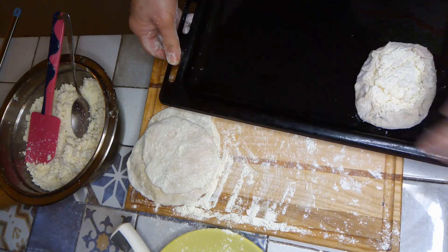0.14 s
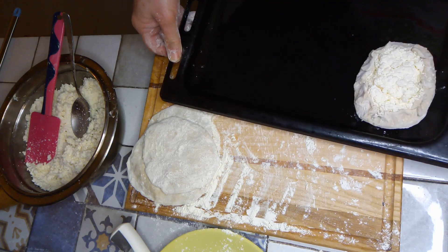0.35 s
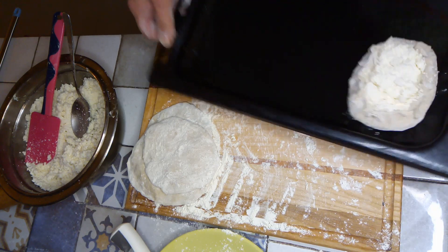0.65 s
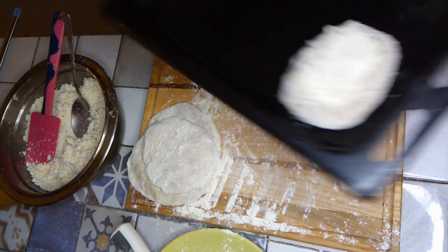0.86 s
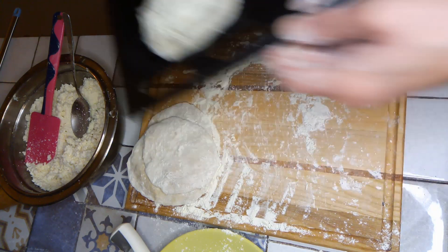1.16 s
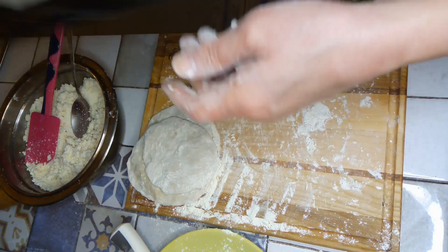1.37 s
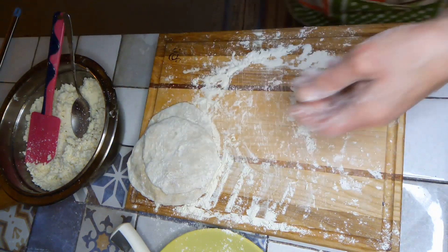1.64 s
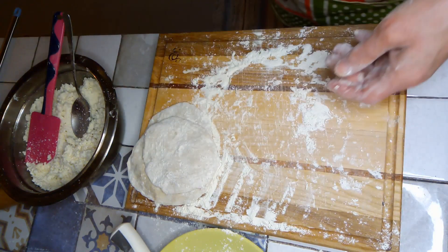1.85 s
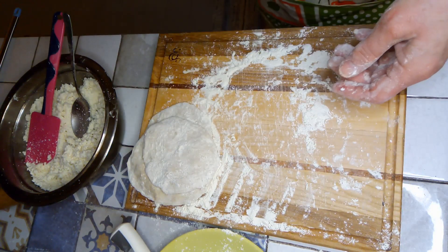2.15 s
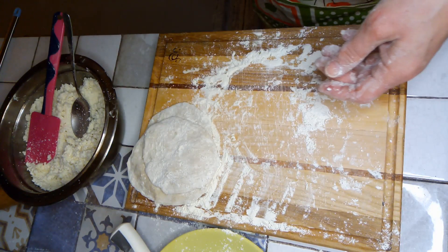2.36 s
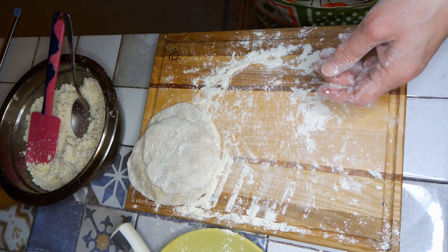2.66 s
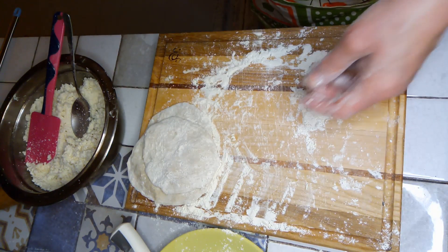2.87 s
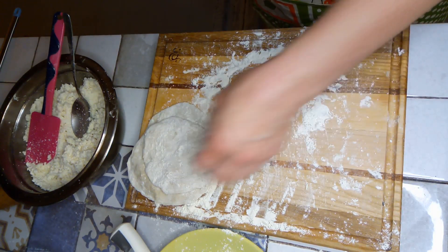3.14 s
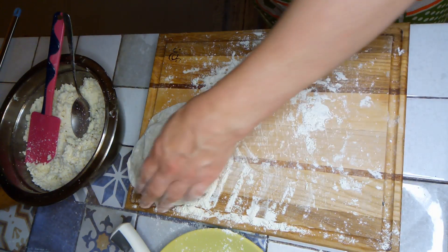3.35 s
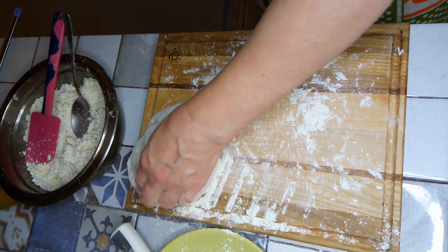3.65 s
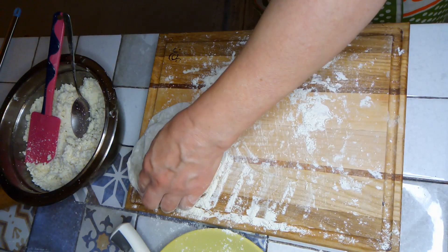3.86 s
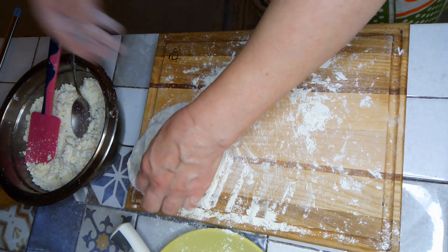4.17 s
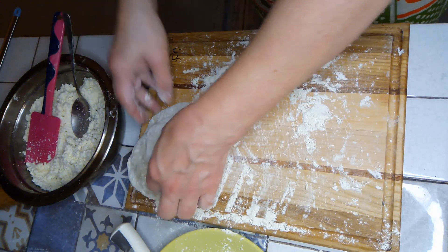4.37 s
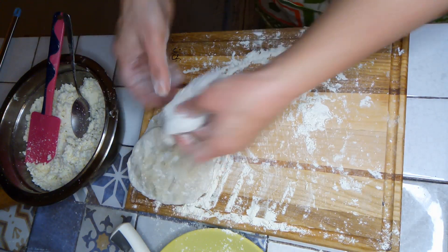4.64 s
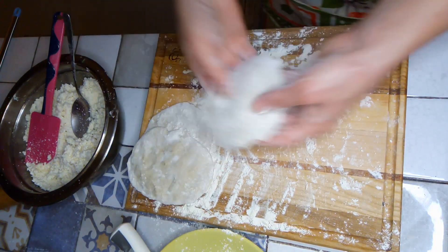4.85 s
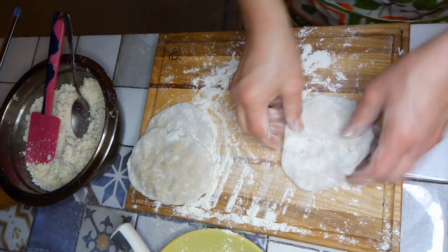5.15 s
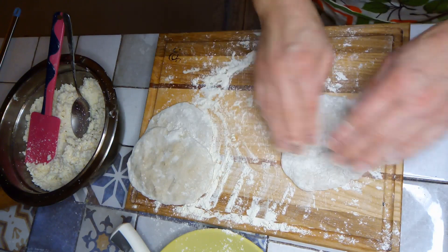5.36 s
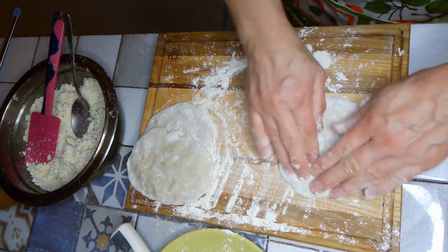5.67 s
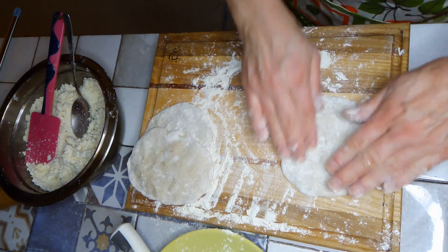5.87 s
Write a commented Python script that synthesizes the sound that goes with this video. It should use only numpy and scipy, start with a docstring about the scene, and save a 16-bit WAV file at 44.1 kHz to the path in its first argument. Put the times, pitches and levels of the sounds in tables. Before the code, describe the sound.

Short gritty steel scrapes, a hard clattering knock and woody bumps, then quiet dough handling over faint room hum.

```python
"""A baking tray is slid off a floured wooden board in short pulls and put down to one side with a knock.
The slide is grainy friction noise ringing sheet-steel modes; the knock is struck modes plus dense clatter.
The wooden furniture under the tray bumps, shudders and knocks. Hands press, flip and pat dough: soft hisses
of flour, dull pats, ticking crumbs. A thin metal object, likely a steel bowl, sings faintly when grazed.
A small kitchen answers with decaying noise; behind it all lie room air, a wavering hum and faint hiss."""
import sys
import numpy as np
from scipy import signal
from scipy.fft import rfft, irfft, next_fast_len
from scipy.io import wavfile
from scipy.ndimage import uniform_filter1d, map_coordinates

SR = 44100
rng = np.random.default_rng(int(sys.argv[2]) if len(sys.argv) > 2 else 0)


def log_audio(samples):
    """Write samples as a 16-bit WAV file to the path given in sys.argv[1]."""
    # one column per channel
    frames = np.atleast_2d(samples).T
    # limit to full scale, then quantise
    limited = np.clip(frames, -1, 1)
    pcm = np.round(limited * 32767).astype(np.int16)
    wavfile.write(sys.argv[1], SR, pcm)


N = 265041


def amp(db):
    """Decibels to gain."""
    return 10 ** (np.asarray(db) / 20)


def unit(x):
    """Scale to rms 1."""
    return x / np.sqrt(np.mean(x ** 2) + 1e-20)


def clock():
    """The time of every sample, in seconds."""
    return np.arange(N) / SR


def along(points, hz):
    """(Hz, value) points read on a log frequency axis."""
    point_hz, values = np.transpose(points)
    return np.interp(np.log(hz + 1), np.log(point_hz + 1), values)


def swell(centre_s, sigma_s):
    """A Gaussian bell of gain around centre_s."""
    return np.exp(-.5 * ((clock() - centre_s) / sigma_s) ** 2)


def stroke(start_s, length_s, rise_db_per_s, fall_db_per_s):
    """Gain of one sliding movement: it takes hold, lasts and dies away."""
    t = clock() - start_s
    before_s = np.maximum(-t, 0)
    after_s = np.maximum(t - length_s, 0)
    return amp(-rise_db_per_s * before_s - fall_db_per_s * after_s)


def wobble(knots_per_s):
    """A smooth random curve of rms 1."""
    knots = rng.standard_normal(int(N * knots_per_s / SR) + 4)
    return unit(map_coordinates(knots, [clock() * knots_per_s]))


def sine(hz):
    """A tone of rms 1 that follows a frequency curve."""
    return np.sqrt(2) * np.sin(2 * np.pi * np.cumsum(hz) / SR)


def filtered(x, response):
    """x times a response of frequency."""
    size = next_fast_len(N + SR // 4)
    spectrum = rfft(x, size) * response(np.fft.rfftfreq(size, 1 / SR))
    return irfft(spectrum, size)[:N]


def noise(colour):
    """Noise of rms 1 with a (Hz, dB) colour."""
    return unit(filtered(rng.standard_normal(N), lambda hz: amp(along(colour, hz))))


def resonance(hz, centre_hz, width_hz):
    """Causal response of one mode."""
    return 1j * hz * width_hz / (centre_hz ** 2 - hz ** 2 + 1j * hz * width_hz)


def resonances(hz, modes):
    """Sum of (Hz, width Hz, dB) modes."""
    return sum(amp(db) * resonance(hz, centre_hz, width_hz) for centre_hz, width_hz, db in modes)


def grains(slips_per_s, smooth):
    """Friction: random tiny slips on a bed of smooth rubbing."""
    slips = (rng.random(N) < slips_per_s / SR) * rng.standard_normal(N)
    return unit(unit(slips) + smooth * rng.standard_normal(N))


def patchy(x, depth_db):
    """A moving contact favours ever different pitches: random gain patches in time and frequency."""
    z = signal.stft(x, nperseg=1024)[2]
    field = uniform_filter1d(rng.standard_normal(z.shape), size=4, axis=0)  # across frequency
    field = uniform_filter1d(field, size=6, axis=1)  # across time
    return unit(signal.istft(z * amp(depth_db * unit(field)), nperseg=1024)[1][:N])


def dense_modes(x, t60_s):
    """The countless high modes of a steel sheet: a short random ring that gives a hiss fine streaks."""
    t = clock()[:SR // 4]
    ring = rng.standard_normal(len(t)) * amp(-60 * t / t60_s)
    return unit(signal.fftconvolve(x, ring)[:N])


def strike(blows, modes, clatter_t60_s, attack_s):
    """Each blow rings the modes and a brief dense clatter; a long, soft contact builds slowly, with less treble."""
    # clatter colour: f/Hz, relative level/dB
    clatter_colour = [(100, -22), (300, -3), (600, 0.5), (950, 5), (1300, -4), (1700, -3.5), (2100, -11),
                      (2600, -11.5), (3300, -19.5), (4200, -25.5), (6000, -28), (11000, -40.5),
                      (16000, -52.5)]
    out, t = np.zeros(N), clock()[:SR]
    for start_s, db, contact_ms, clatter_db, low_hz in blows:
        contact_s = contact_ms / 1000
        ring = np.zeros(SR)
        for hz, mode_db, t60_s in modes:
            level_db = mode_db + rng.normal(0, 1)  # every blow excites the modes a little differently
            ring += amp(level_db - 60 * t / t60_s) * np.sin(2 * np.pi * hz * t)
        clatter = amp(clatter_db - 60 * t / clatter_t60_s) * noise(clatter_colour)[:SR]
        rise = 1 - np.exp(-t / (attack_s + 1.9 * contact_s))
        force = np.sin(np.pi * np.minimum((t + 1 / SR) / contact_s, 1)) ** 2  # one smooth push
        blow = signal.fftconvolve((clatter - ring) * rise, force / force.sum())[:SR]
        # a glancing blow hardly moves the lowest modes
        highpass = signal.butter(2, low_hz, "high", fs=SR, output="sos")
        out[round(start_s * SR):][:SR] += amp(db) * signal.sosfilt(highpass, blow)
    return out


def background():
    """Still room air, the wavering hum of an appliance and faint microphone hiss."""
    # room air: f/Hz, relative density/dB
    air_colour = [(15, -74.5), (25, -29), (68, -11), (130, -4), (205, -6), (241, -1.5), (268, -11.5),
                  (436, -14.5), (636, -17.5), (690, -12.5), (748, -16), (1920, -21), (5970, -25.5),
                  (8030, -33), (15800, -36)]
    # microphone hiss: f/Hz, relative density/dB
    hiss_colour = [(5000, -33), (13000, -22), (14300, -2.5), (15300, 5.5), (16000, 5.5)]
    # appliance hum: f/Hz, mean level/dB, rms frequency waver/Hz
    hum_tones = [(239.2, -72.5, 4.08), (716, -86, 8.7), (786, -85, 6.96)]
    hum = np.zeros(N)
    for hz, db, waver_hz in hum_tones:
        hum += amp(db + 2.4 * wobble(5.1)) * sine(hz + waver_hz * wobble(30))
    return amp(-65) * noise(air_colour) + hum + amp(-74) * noise(hiss_colour)


def kitchen(x, build_up_s):
    """The room's answer, a noise tail, builds up and dies at its own speed in each band."""
    # reverberation: f/Hz, t60/s
    room_decay = [(120, 0.25), (400, 0.28), (1000, 0.27), (2000, 0.24), (5000, 0.15), (14000, 0.13)]
    hz, t, z = signal.stft(rng.standard_normal(SR // 2), SR, nperseg=256)
    decay = amp(-60 * t / along(room_decay, hz)[:, None])
    build_up = 1 - np.exp(-t / build_up_s)
    tail = signal.istft(z * decay * build_up, SR, nperseg=256)[1]
    return signal.fftconvolve(x, tail / np.linalg.norm(tail))[:N]


def bowl():
    """A light graze, as noise, rubs a few narrow metal modes into a faint ring."""
    # grazes: t/s, level/dB, sigma/s
    grazes = [(3.082, -70, 0.025), (3.374, -61.5, 0.039)]
    # thin metal, likely the steel bowl: f/Hz, width/Hz, relative level/dB
    bowl_modes = [(2005, 29, 3.5), (3670, 40, -3), (4920, 54, -6), (6960, 22, -1.5), (8420, 31, -13),
                  (9170, 140, -14)]
    ring = unit(filtered(rng.standard_normal(N), lambda hz: resonances(hz, bowl_modes)))
    return ring * sum(amp(db) * swell(centre_s, sigma_s) for centre_s, db, sigma_s in grazes)


def crumbs():
    """Crumbs of flour between fingers and board: each gives one tiny tick of resonant noise."""
    # ticks: t/s, level/dB, f/Hz
    ticks = [(1.679, -62, 5000), (1.802, -61, 9000), (1.8049, -52.5, 8800), (5.452, -61, 8500),
             (5.575, -66, 8000)]
    out = np.zeros(N)
    for centre_s, db, pitch_hz in ticks:
        tick = filtered(rng.standard_normal(N), lambda hz: resonance(hz, pitch_hz, 5000) ** 2)
        out += amp(db) * swell(centre_s, 0.00082) * unit(tick)
    return out


def flour_brushes():
    """Skin and dough brush over flour: patchy grain noise, resonating at each stroke's own pitch."""
    # brushes: t/s, level/dB, sigma/s, hiss f/Hz
    brushes = [(1.81, -64, 0.013, 3500), (2.425, -69.5, .02, 6470), (2.518, -69.5, 0.022, 6540),
               (3.124, -75, .028, 6000), (3.34, -69.5, 0.059, 7000), (3.384, -59.5, 0.019, 6550),
               (3.527, -69, 0.048, 7300), (4.514, -68.5, 0.025, 4170), (4.896, -68.5, .012, 4540),
               (5.095, -67.5, .038, 6100), (5.141, -58, .015, 7300), (5.185, -49.5, .019, 4850),
               (5.454, -66.5, .011, 6100), (5.51, -72, .025, 6500), (5.65, -62.5, 0.024, 8200),
               (5.8, -71, 0.052, 7260), (5.857, -62.5, 0.01, 8050)]
    # flour friction before each stroke's resonance: f/Hz, relative density/dB
    flour_colour = [(200, -22), (700, -18), (1600, -2), (2800, 1), (4500, -7.5), (6300, -3.5),
                    (8000, -11.5), (10000, -8), (12500, -27.5), (16000, -9)]
    friction = grains(slips_per_s=2500, smooth=0.76)
    powder = patchy(filtered(friction, lambda hz: amp(along(flour_colour, hz))), depth_db=2.5)
    out = np.zeros(N)
    for centre_s, db, sigma_s, hiss_hz in brushes:
        hiss = unit(filtered(powder, lambda hz: resonance(hz, hiss_hz, 4100)))
        out += amp(db) * swell(centre_s, sigma_s) * hiss
    return out


def dough_pats():
    """Soft dough meets the board: short swells of dull noise."""
    # pats: t/s, level/dB, sigma/s
    pats = [(1.054, -65.5, 0.014), (4.522, -66.5, .013), (5.187, -57.5, 0.019), (5.454, -69, .016)]
    # dough on board: f/Hz, relative density/dB
    dough_colour = [(60, -17), (150, -10), (280, -6), (350, -3), (450, 9), (620, -21), (920, 8),
                    (1300, -20), (3000, -38)]
    return noise(dough_colour) * sum(amp(db) * swell(centre_s, sigma_s) for centre_s, db, sigma_s in pats)


def wood_knocks():
    """The furniture under the tray bumps and knocks: mostly soft contacts ring its wooden modes."""
    # blows: t/s, gain/dB, contact/ms, clatter level/dB, high-pass f/Hz
    wood_blows = [(2.358, -40, 4, -25, 90), (2.392, -15, 4.4, -21, 91), (2.434, -35, 3.16, -25, 96),
                  (2.5768, -27.5, 0.15, -8, 235)]
    # wooden furniture: f/Hz, mean relative level/dB, t60/s
    wood_modes = [(126, -16, .25), (160, -1, .075), (187, -10, .18), (296, -2, .18), (347, 0, .06),
                  (431, -7, .1), (473, -7, .09), (671, -14, .11), (740, -10, .04), (868, -20, .2),
                  (934, -12, .12), (1012, -16, .07), (1149, -18, .13), (1361, -6, .035), (1560, -10, .05),
                  (1660, -17, .11), (1841, -25, .16), (2525, -20, .06), (2690, -24, .13), (3150, -25, .06)]
    return strike(wood_blows, wood_modes, clatter_t60_s=0.1, attack_s=0.00043)


def wood_shudder():
    """Wood slips on wood under the shifting load: brief bursts of a low, wavering tone."""
    # shudders: start t/s, length/s, level/dB
    shudders = [(2.495, .012, -50), (2.547, 0.024, -45)]
    shudder_hz = 136 + 7 * wobble(34.95)
    effort = np.zeros(N)
    for start_s, length_s, db in shudders:
        effort += amp(db) * stroke(start_s, length_s, rise_db_per_s=800, fall_db_per_s=260)
    return effort * sine(shudder_hz)


def tray_landing():
    """The tray is put down: short, hard contacts ring its modes and a clatter."""
    # blows: t/s, gain/dB, contact/ms, clatter level/dB, high-pass f/Hz
    tray_blows = [(2.1528, -12, 0.23, -11, 144), (2.1575, -34, .05, 7.5, 700),
                  (2.1715, -32.5, 0.28, -6, 450)]
    # landing tray: f/Hz, mean relative level/dB, t60/s
    tray_modes = [(145, -24, .22), (184, -22, .25), (243, -4.5, .065), (295, -14, .06), (380, -6, .05),
                  (395, -19, .18), (431, 2, .055), (473, -24, .2), (546, -20, .08), (672, -13, .025),
                  (726, -25, .06), (788, -28, .24), (879, -27, .3), (941, -14, .1), (1098, -17, .07),
                  (1200, -23, .06), (1360, -20, .08), (1541, -22, .09), (1658, -24, .07), (1779, -20, .29),
                  (2159, -27, .07)]
    return strike(tray_blows, tray_modes, clatter_t60_s=.045, attack_s=.0008)


def tray_slide():
    """Steel drags over floury wood in a few pulls, ringing its sheet modes; the rim catches on the board."""
    # pulls: start t/s, length/s, starting level/dB before flutter, starting tilt/dB (+ hisses, - grinds),
    # release/(dB/s)
    pulls = [(.481, 0.0067, -63, -1, 700), (.622, .03, -56, -9, 700), (.736, 0.032, -40, 0, 900),
             (.802, 0.019, -53.5, -4, 450), (.872, 0.18, -45, 3.5, 360), (1.17, 0.072, -62.5, -1.5, 200),
             (1.256, 0.016, -48, 1, 560)]
    # rim catches: t/s, squeak level/dB, sigma/s, f/Hz
    catches = [(.574, -45.5, 0.0069, 1860), (0.614, -54, 0.011, 1730), (1.27, -65, 0.053, 1644)]
    # steel on floury wood: f/Hz, relative density/dB
    scrape_colour = [(120, -35), (300, -13.5), (650, -25), (1100, -7.5), (2000, -6.5), (3200, -7),
                     (5200, -4.5), (6600, -4.5), (7700, -7), (9600, -11), (11500, -16), (13000, -23.5),
                     (15200, -11.5), (16000, -9)]
    # the tray's sheet steel: f/Hz, width/Hz, relative level/dB
    sheet_modes = [(1594, 60, -1), (2023, 35, 0), (2630, 35, -2), (3395, 25, 1), (4414, 25, 1),
                   (4816, 30, -1), (5414, 25, 1), (6361, 30, 4), (6520, 120, 0), (6660, 50, 4),
                   (8450, 130, -5)]
    grip_db_per_s = 720  # how fast a pull takes hold
    lean_db_per_s, darken_db_per_s = 26, 21  # weight comes onto the rim: louder and duller

    friction = grains(slips_per_s=2000, smooth=1.0)
    rub = filtered(friction, lambda hz: amp(along(scrape_colour, hz)))
    ring = unit(filtered(rub, lambda hz: resonances(hz, sheet_modes)))
    streaks = dense_modes(rub, t60_s=0.073)
    drag = patchy(unit(rub) + amp(-3.5) * streaks + amp(-4.0) * ring, depth_db=3)
    # a light, quick drag hisses; a heavy one grinds lower
    fizz = filtered(drag, lambda hz: hz ** 4 / (hz ** 4 + 6000 ** 4))
    grind = drag - fizz

    out = np.zeros(N)
    for start_s, length_s, db, start_tilt_db, release_db_per_s in pulls:
        held_s = np.clip(clock() - start_s, 0, length_s)
        tilt_db = start_tilt_db - darken_db_per_s * held_s
        grip = stroke(start_s, length_s, grip_db_per_s, release_db_per_s)
        effort = amp(db + lean_db_per_s * held_s) * grip
        out += effort * (fizz * amp(tilt_db) + grind * amp(-tilt_db))
    out *= amp(1.1 * wobble(120) - 1.5)  # flutter

    for centre_s, db, sigma_s, pitch_hz in catches:
        squeak = unit(filtered(rng.standard_normal(N), lambda hz: resonance(hz, pitch_hz, 480) ** 2))
        out += amp(db) * swell(centre_s, sigma_s) * (squeak + amp(-5.5) * unit(rub))
    return out


def scene():
    """Near sounds on the board are drier; the knocks to the side are wetter, mostly in the upper middle."""
    # room share of the far sounds: f/Hz, gain/dB
    far_echo = [(130, -14), (250, -16), (450, -19), (750, -7.5), (1000, -8.5), (1700, -10.5), (3000, -7.5)]
    near = tray_slide() + flour_brushes() + dough_pats() + crumbs() + bowl()
    far = tray_landing() + wood_knocks() + wood_shudder()
    near_room = amp(-12) * kitchen(near, build_up_s=0.0029)
    far_room = filtered(kitchen(far, build_up_s=0.0085), lambda hz: amp(along(far_echo, hz)))
    return (near + near_room + far + far_room + background())[None]


def record(dry):
    """A sharp band limit: nothing passes from 15850 Hz up."""
    return filtered(dry[0], lambda hz: hz < 15850)[None]


dry = scene()
out = record(dry)
log_audio(out)
```